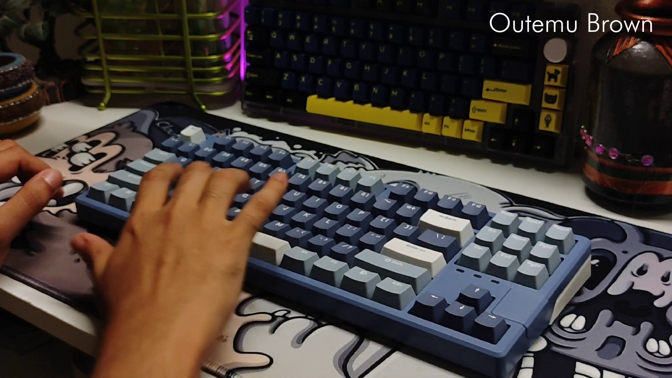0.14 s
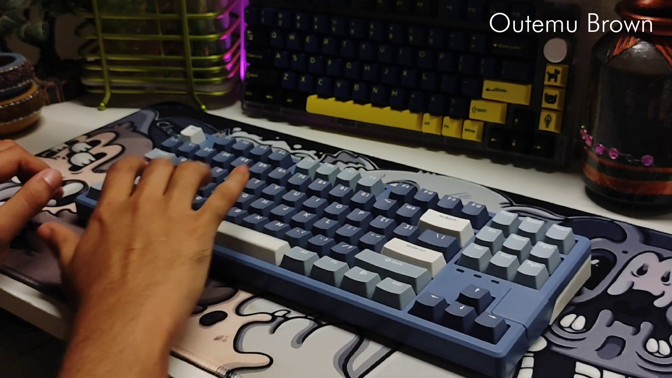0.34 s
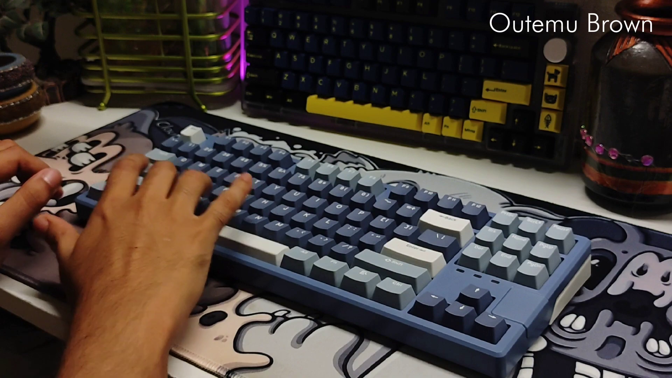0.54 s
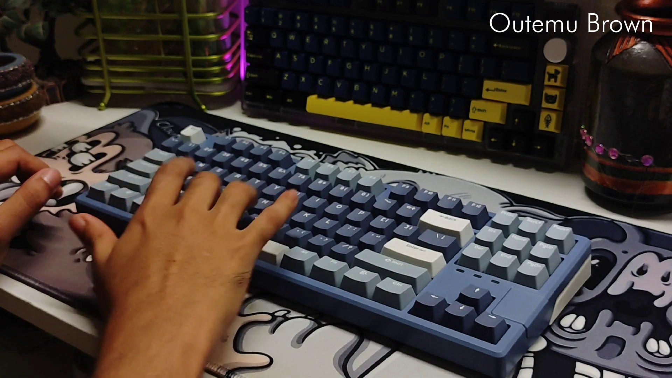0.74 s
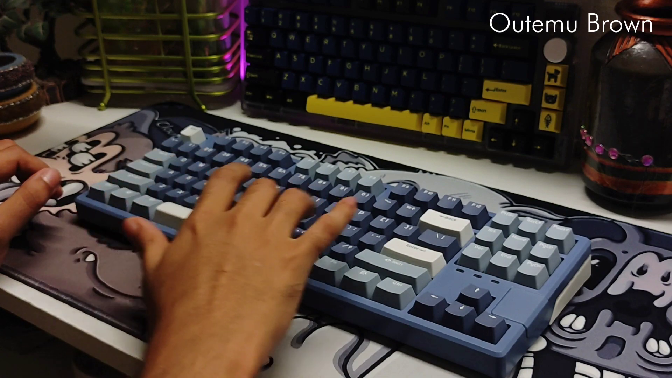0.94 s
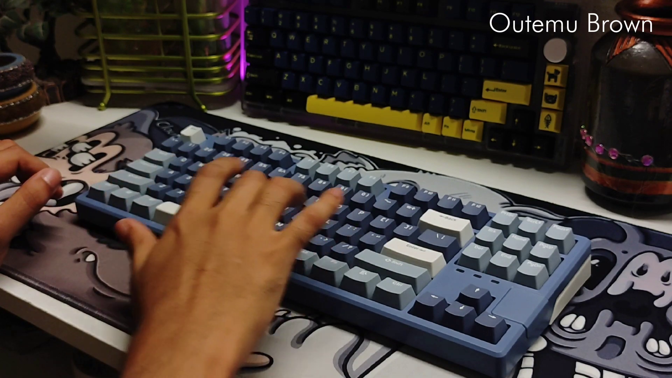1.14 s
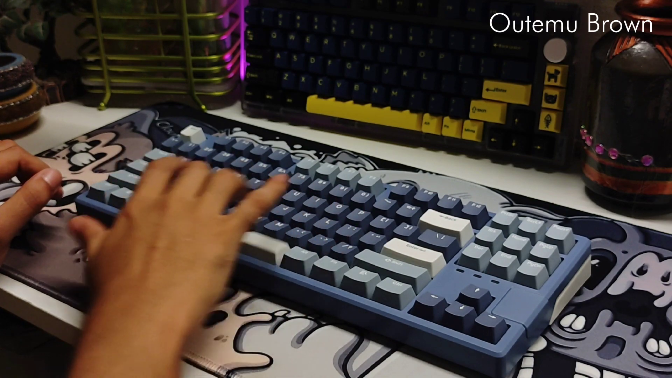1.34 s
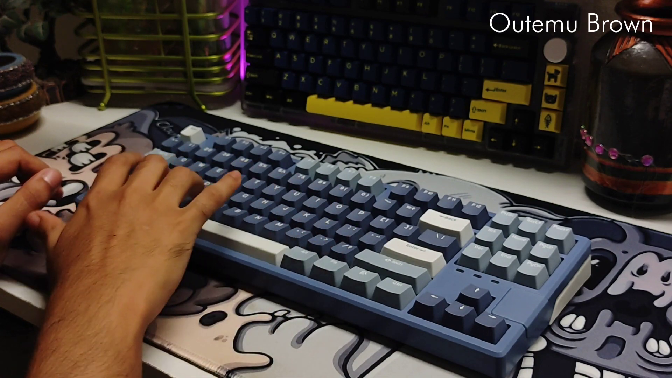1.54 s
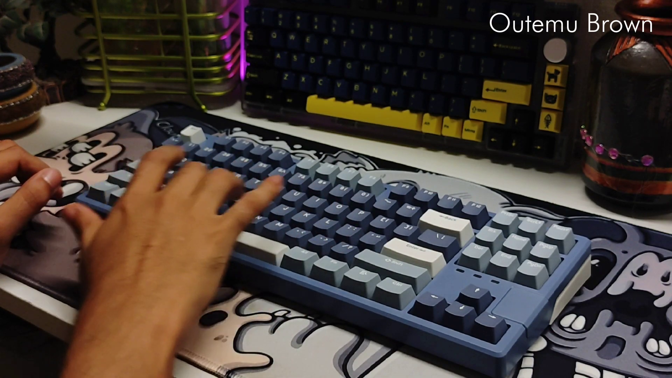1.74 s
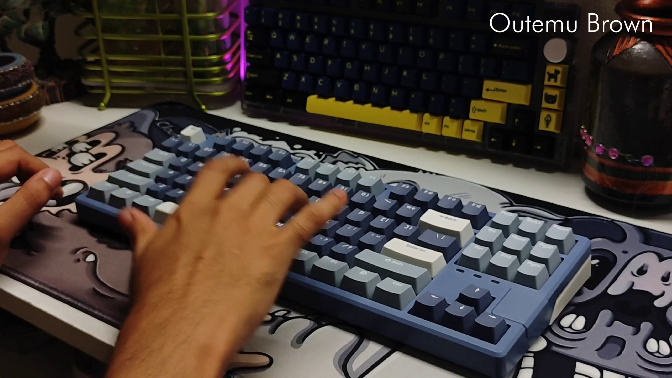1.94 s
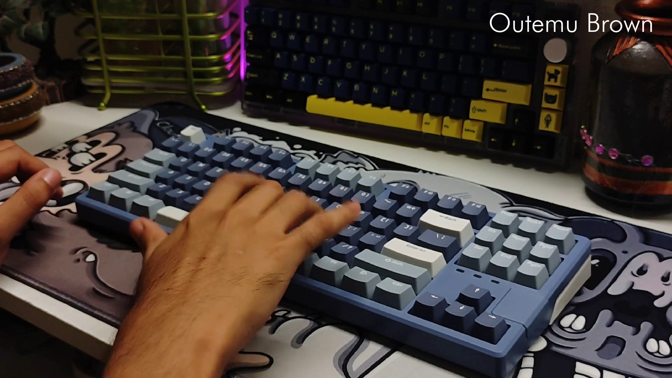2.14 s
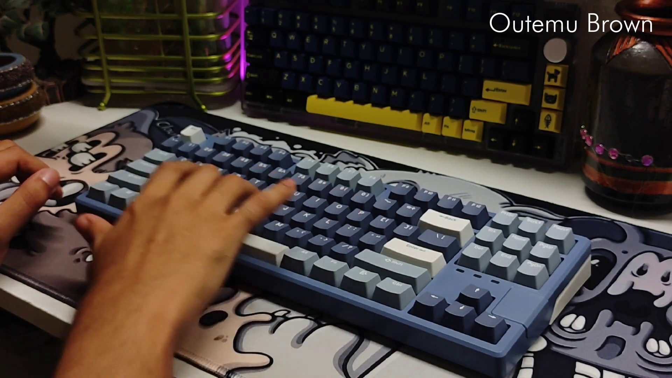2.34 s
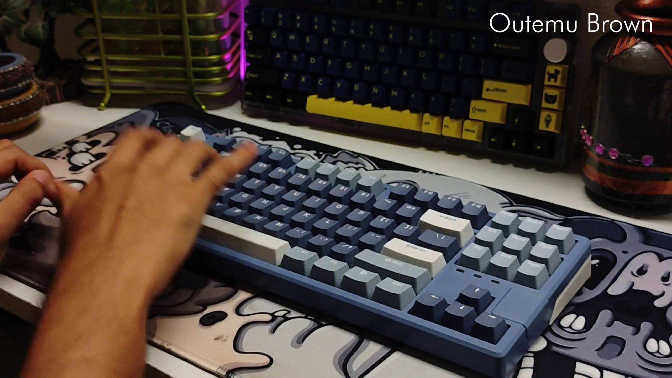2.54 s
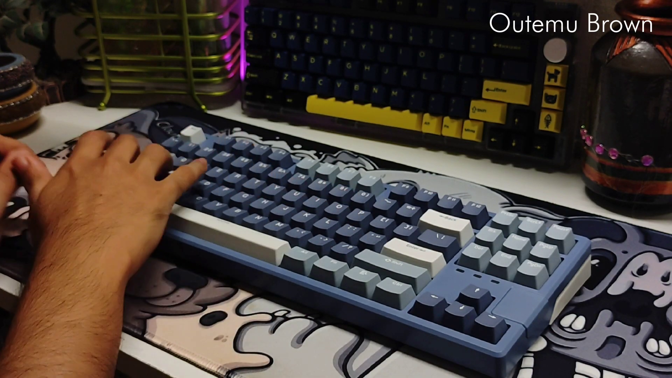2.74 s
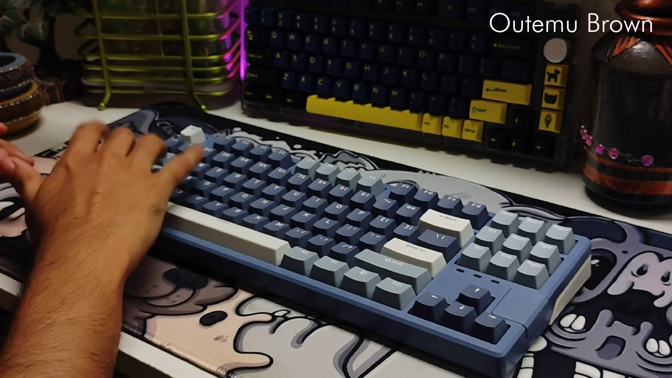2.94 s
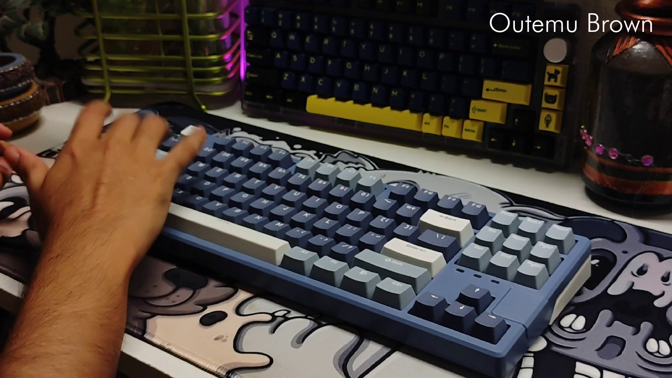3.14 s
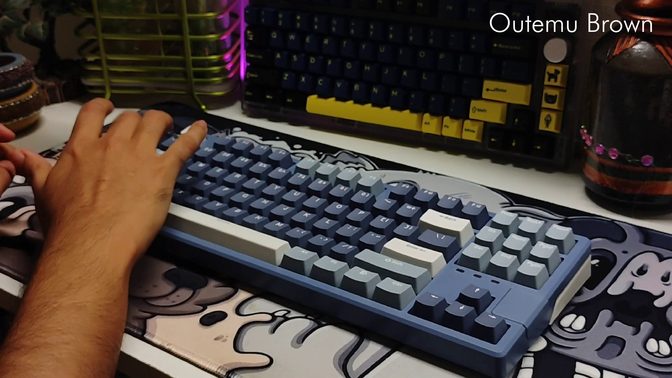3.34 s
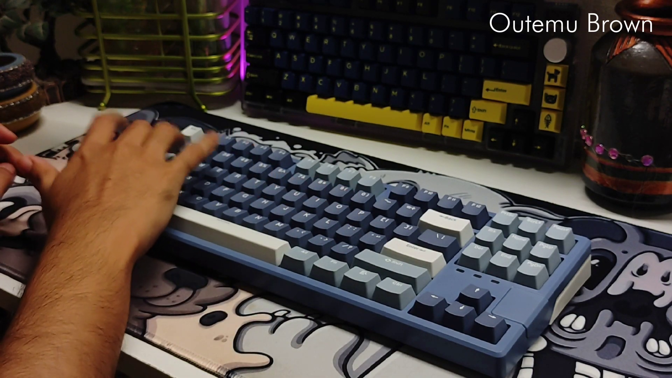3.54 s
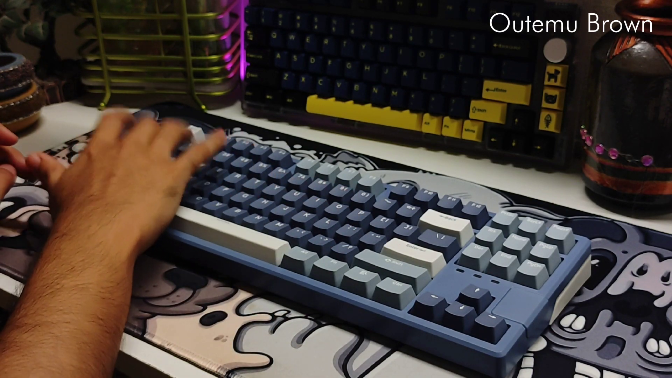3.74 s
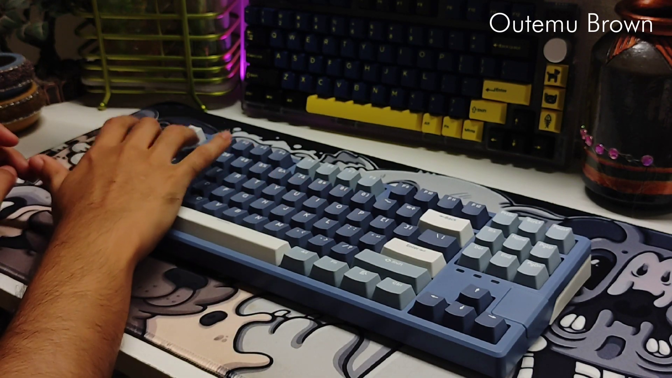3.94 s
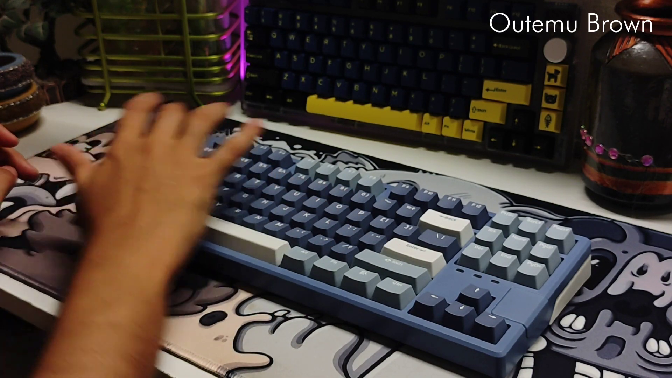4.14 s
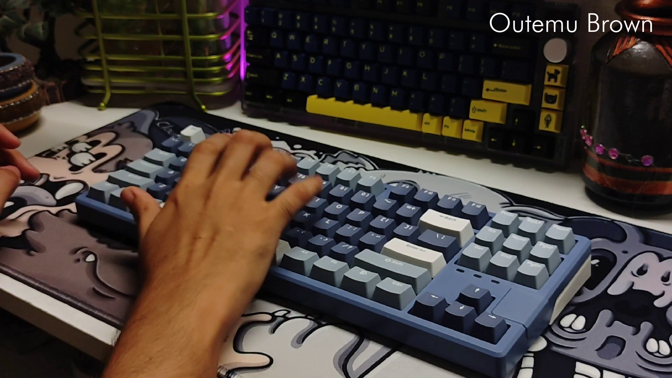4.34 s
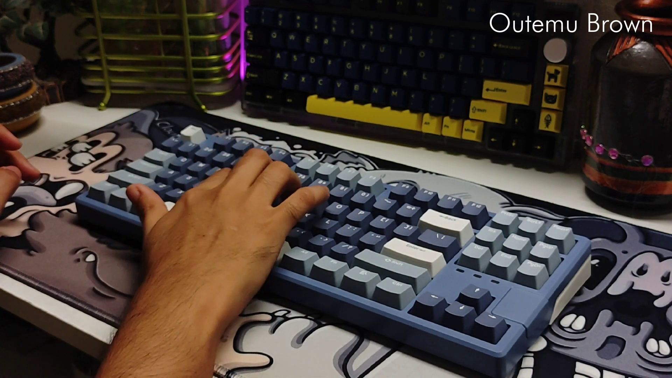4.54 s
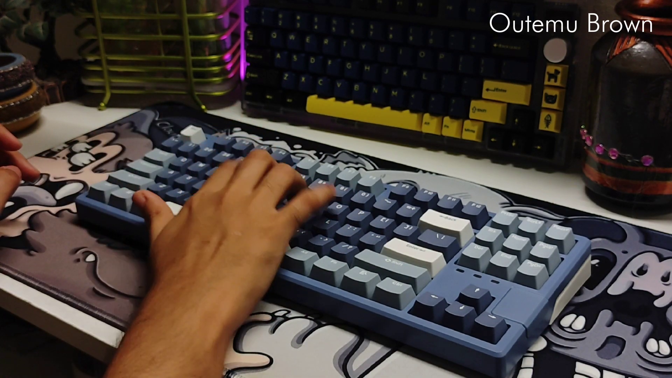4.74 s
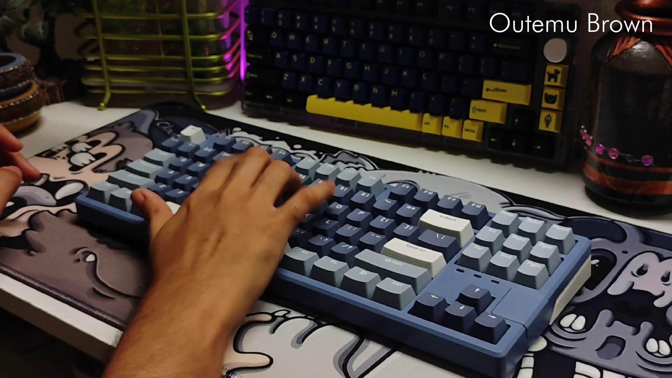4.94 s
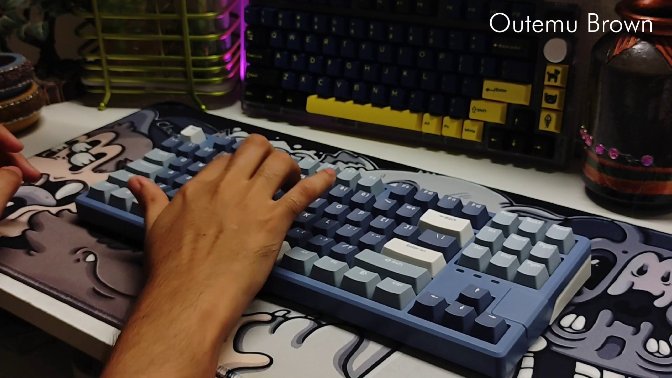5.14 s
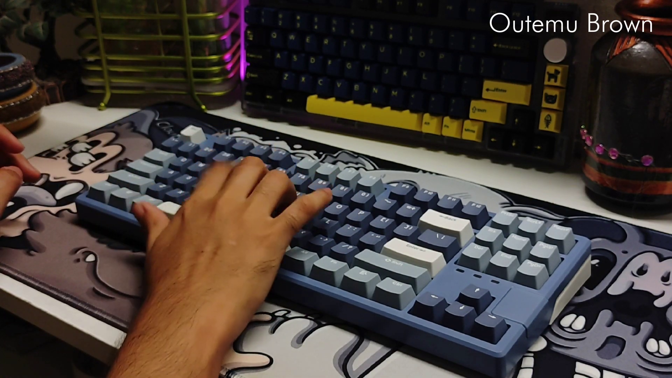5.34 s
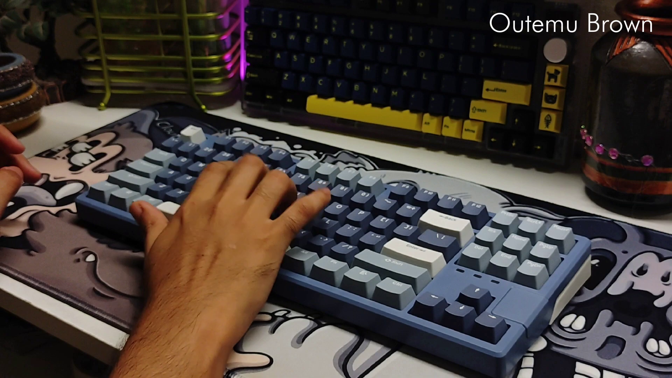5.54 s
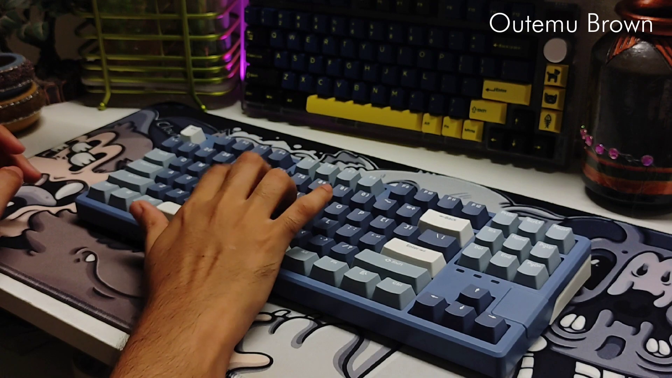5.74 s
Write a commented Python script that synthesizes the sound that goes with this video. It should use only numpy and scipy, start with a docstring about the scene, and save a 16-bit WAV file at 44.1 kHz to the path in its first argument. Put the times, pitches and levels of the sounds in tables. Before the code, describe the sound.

Close, dry key clatter in a small, quiet indoor room. Each press lands with a dull plastic clack, each release snaps back brighter, with tiny stem scrapes, finger taps and rattles. Rolling strokes grow harder around two to four seconds, pause briefly, then resume as a quicker, softer patter with a small break near five seconds. Low desk thuds and very faint spring ringing sit underneath.

```python
"""Fast dull clacks and bright clicks: one hand drums on a mechanical keyboard, close to the microphone.
The board lies on a desk mat in a quiet room. Keys clack dull at the bottom and bright on springing back,
as struck plate and cap modes; stem scrape and finger rub are coloured noise, rattles are random knocks.
The hollow case and the desk thump as low modes, springs ping in faint clusters of tones,
and the small room smears it all with fading noise tails over a steady bed of air noise."""
import sys
import numpy as np
from scipy import signal
from scipy.fft import rfft, irfft
from scipy.io import wavfile

SR = 44100
rng = np.random.default_rng(int(sys.argv[2]) if len(sys.argv) > 2 else 0)


def generate_wav(sig):
    """Save sig (samples, or channels by samples) to the path in sys.argv[1] as 16-bit PCM at SR."""
    pcm = np.round(np.clip(np.atleast_2d(sig).T, -1, 1) * 32767).astype(np.int16)
    wavfile.write(sys.argv[1], SR, pcm)


N = 260171

# key strokes, down and up: t/s, clack level/dB, click level/dB, clack centre f/Hz
KEY_STROKES = [(0.025, -27, -49, 2420), (0.073, -24.5, -23.5, 2600), (0.215, -36.5, -53, 1950),
               (0.303, -32, -30.5, 2350), (0.4, -38, -59, 1970), (0.482, -38.5, -39, 2750),
               (0.559, -37, -54, 1900), (0.635, -29, -29.5, 3170), (0.713, -31, -49, 1570),
               (0.803, -30, -29, 2770), (0.974, -38.5, -33.5, 2400), (1.028, -29, -52, 2180),
               (1.13, -34.5, -28.5, 2580), (1.219, -27.5, -55, 2420), (1.307, -31.5, -28.5, 3050),
               (1.387, -35, -45.5, 1900), (1.471, -39.5, -37, 2570), (1.537, -30.5, -47, 2340),
               (1.632, -35.5, -34.5, 2830), (1.703, -28, -44, 2150), (1.857, -37, -62, 1900),
               (1.936, -32, -33.5, 2840), (2, -26.5, -47, 2440), (2.078, -28, -25, 3400),
               (2.165, -23.5, -41.5, 2800), (2.257, -30, -25.5, 2860), (2.34, -38.5, -53, 1560),
               (2.461, -22, -33.5, 2830), (2.555, -29, -28, 2430), (2.748, -22, -31, 1740),
               (2.83, -31.5, -33, 1530), (2.907, -26.5, -34, 3570), (2.986, -29.5, -33, 1550),
               (3.053, -21.5, -27.5, 4030), (3.142, -27, -26.5, 1460), (3.265, -28, -32.5, 1740),
               (3.332, -28.5, -26, 1860), (3.425, -30, -35, 1770), (3.493, -30.5, -26.5, 1830),
               (3.562, -29.5, -33, 2000), (3.647, -29.5, -25, 1670), (3.771, -24.5, -23, 2220),
               (3.844, -33, -25.5, 2260), (3.935, -28.5, -33, 2150), (4.094, -36, -30.5, 2430),
               (4.492, -32.5, -41.5, 1910), (4.553, -34, -44.5, 1970), (4.615, -37.5, -36, 2120),
               (4.647, -36.5, -35, 1870), (4.737, -29.5, -43, 1880), (4.792, -33, -42.5, 1930),
               (4.841, -35, -29.5, 2260), (4.893, -33.5, -26.5, 2070), (4.939, -36.5, -44, 1900),
               (4.994, -25.5, -33.5, 2080), (5.067, -46, -39, 2090), (5.113, -34.5, -36, 2178),
               (5.359, -37.5, -54, 1960), (5.393, -29, -31.5, 2900), (5.456, -34, -31, 2280),
               (5.496, -37.5, -35.5, 2120), (5.585, -34, -46.5, 2022), (5.633, -37, -46.5, 2380),
               (5.694, -34.5, -32.5, 2570), (5.733, -43, -42, 2400), (5.802, -34.5, -45.5, 2140),
               (5.856, -36.5, -48, 2420)]
# places the hand moves over, each sounding different: from t/s, two cap rings f/Hz, f/Hz,
# cap focus/dB lost one octave away, scrape level/dB re mean of clack and click, rub level/dB,
# hollow level/dB re clack, case level/dB for a middling press, bump lead t/ms, bump level/dB on a press,
# desk level/dB for a middling stroke (midway between press and release), spring level/dB re click
KEY_PLACES = [(0, 4500, 7460, 4, -8, -61.5, -9, -35, 21.3, -47, -37, -52),
              (2.05, 4140, 8050, 12, -16.5, -59, -11, -35.5, 25, -46, -36.5, -33),
              (2.7, 5100, 6960, 13, -21, -63, -13, -51, 10.5, -56, -40, -37),
              (3.1, 7860, 9600, 380, -39, -68, -7, -47.5, 11, -44.5, -43, -36),
              (3.2, 5600, 8830, 32, -20, -76, -8, -46, 6.3, -68.5, -35.5, -30),
              (3.7, 6700, 10400, 110, -21, -80, -8, -46, 6.3, -60.5, -36, -17),
              (4.4, 7540, 8730, 490, -9.5, -66, -16, -48, 5.9, -45.5, -36.5, -29.5)]
# loudest finger taps and rebounds: t/s, clack level/dB, click level/dB
FINGER_TAPS = [(0.005, -38.5, -37.5), (0.011, -39, -52), (0.062, -33.5, -40), (0.197, -39, -39),
               (0.372, -36, -35.5), (0.865, -51, -65), (1.197, -44, -44.5), (1.364, -39, -36),
               (1.505, -45.5, -42.5), (2.146, -54, -44), (2.888, -62, -40.5), (3.258, -45, -34.5),
               (3.505, -39, -41), (3.658, -39, -38), (3.85, -47, -35), (3.856, -77.5, -40),
               (4.085, -47, -48), (4.098, -70, -38), (4.468, -54, -56), (4.599, -43.5, -44),
               (4.621, -44, -39.5), (4.73, -46, -44), (4.741, -36, -42), (4.782, -47, -46),
               (4.827, -44, -38.5), (4.944, -37, -45), (5.073, -44, -45), (5.086, -45, -38.5),
               (5.339, -48, -52), (5.347, -43, -46.5), (5.45, -40, -44), (5.74, -38, -37),
               (5.848, -43, -50)]
# strokes after which the hand slides on: t/s, added rub level/dB
HAND_SLIDES = [(0.072, 3.5), (0.803, 6.5), (1.218, 6), (1.702, 9)]
# plate modes: f/Hz, level/dB, t60/ms
PLATE_MODES = [(1250, 5, 11), (1950, 7, 10), (2186, 12, 10), (2666, 10, 8), (3140, 16, 5), (3450, 10, 12),
               (3970, 11, 7)]
# cap modes: f/Hz, level/dB, t60/ms
CAP_MODES = [(4430, 10, 11), (5100, 7, 8), (6400, 12, 3.5), (6890, 6, 8), (7500, 9, 8), (8650, 11.5, 7),
             (10340, 0, 6), (11700, 4, 6)]
# hollow case modes: f/Hz, level/dB, t/ms until the swing is widest
CASE_MODES = [(177.4, -3, 13.3), (227.6, 9.5, 5.5), (310.3, -3.5, 11.6)]
# air under the plate, modes: f/Hz, level/dB, t60/ms
HOLLOW_MODES = [(426, -11, 54), (630, -1, 17), (1047, 10.5, 5.9)]
# spring modes: f/Hz, level/dB, t60/ms
SPRING_MODES = [(5130, 10, 240), (6270, -9, 150), (6710, 0, 320), (7430, -8, 150), (8750, -4, 150),
                (9030, -6, 130), (10350, -3, 170)]
# desk modes: f/Hz, level/dB, t60/ms
DESK_MODES = [(45.6, 2, 480), (57.7, 16, 185), (78.5, 14, 108), (111.2, 9, 100)]
# room tail: f/Hz, level/dB, t60/s
ROOM_TAIL = [(60, -33.5, 0.53), (195, -1.5, 0.57), (440, 2.5, 0.48), (2140, -4.5, 0.3), (5370, -4.5, 0.32),
             (8500, -9.5, 0.32), (14200, -16.5, .3)]
# spectrum of the quiet room's air: f/Hz, relative level/dB per Hz
AIR_SPECTRUM = [(18, -30), (35, -3), (100, 0), (250, -15), (700, -30), (2200, -32), (5000, -43),
                (15000, -55)]

AIR_DB = -51  # rms
MIDDLING_DB = -27  # a stroke of middling strength
CASE_PER_DB, DESK_PER_DB = 0.26, 0.41  # dB gained per dB of stroke
DESK_PRESS_DB = 3.2  # added on a press, taken off on a release
CASE_RELEASE_DB, BUMP_RELEASE_DB = 2, -1  # what a release adds
SCRAPE_RELEASE_DB = -13  # the stem slides back almost freely
BUMP_SPREAD, BUMP_CLICK_DB = 0.11, -10  # share of the lead; click relative to clack


def undb(db):
    """Turn decibels into an amplitude factor."""
    return 10 ** (np.asarray(db) / 20)


def level(rows, db, size):
    """Scale each row so that its first samples have the given rms level."""
    rms = np.sqrt(np.mean(rows[:, :size] ** 2, axis=1))
    return rows * (undb(db) / rms)[:, None]


def place(times, rows):
    """Lay each row on the time line."""
    out = np.zeros(N + 2 * SR)
    for s, row in zip(times, rows):
        at = max(int(s * SR), 0)
        out[at:at + len(row)] += row
    return out[:N]


def octaves_off(hz, centres_hz):
    """Squared distance in octaves from each frequency to the nearest of each event's centres."""
    centres_hz = centres_hz.reshape(len(centres_hz), 1, -1)
    return np.min(np.log2(hz[:, None] / centres_hz) ** 2, axis=2)


def bins_hz(size):
    """Frequencies of the spectrum, kept off zero."""
    return np.maximum(np.fft.rfftfreq(size, 1 / SR), 1)


def ring(modes, centre_hz, focus_db, size, detune, scatter_db):
    """Decaying modes; the struck spot favours those near its centres (focus dB lost one octave away)."""
    hz, db, t60_ms = (column[:, None] for column in np.transpose(modes))
    chance = rng.standard_normal((len(centre_hz), len(modes), 2))
    loss_db = np.minimum(focus_db * octaves_off(hz[:, 0], centre_hz)[..., None], 26)
    db = db - loss_db + scatter_db * chance[..., 1:]
    t = np.arange(size) / SR
    tuned_hz = hz * (1 + detune * chance[..., :1])
    decay = 1000. ** (-1000 * t / t60_ms)
    return np.sum(undb(db) * np.sin(2 * np.pi * tuned_hz * t) * decay, axis=1)


def air():
    """The quiet room's steady noise, shaped by its spectrum."""
    hz, db = np.transpose(AIR_SPECTRUM)
    gain_db = np.interp(np.log(bins_hz(N)), np.log(hz), db)
    noise = irfft(rfft(rng.standard_normal(N)) * undb(gain_db), N)
    return level(noise[None], AIR_DB, size=N)


def contacts(looseness, size, density=.07):
    """A first blow, then sparse smaller knocks of the loose stem that die away."""
    chance = rng.random((len(looseness), size, 2))
    ms = 1000 * np.arange(size) / SR
    fade_ms = 2.66 * np.maximum(looseness[:, None] - .8, .1)
    knocks = (chance[..., 0] < density) * (2 * chance[..., 1] - 1)
    knocks *= np.exp(-(ms / fade_ms) ** 2)
    knocks[:, 0] = 1
    return knocks


def clack(s, clack_db, click_db, plate_hz, cap_hz, focus_db, looseness):
    """Plastic on plate: low plate modes and high cap modes, in loose clusters, rung by the same contacts."""
    blows = contacts(looseness, size=600)
    plate = ring(4 * PLATE_MODES, plate_hz, 30., size=500, detune=.09, scatter_db=2.5)
    plate = signal.fftconvolve(plate, blows, axes=1)
    cap = ring(3 * CAP_MODES, cap_hz, focus_db[:, None, None], size=500, detune=.03, scatter_db=3.)
    cap = signal.fftconvolve(cap, blows, axes=1)
    # a landing lasts a little while, so the plate starts without a sharp edge
    plate = signal.sosfilt(signal.butter(2, [750, 5500], "band", fs=SR, output="sos"), plate)
    cap = signal.sosfilt(signal.butter(1, 3000, "high", fs=SR, output="sos"), cap)
    return place(s, level(plate, clack_db, size=400) + level(cap, click_db, size=400))


def bumps(s, lead_ms, bump_db, cap_hz, focus_db):
    """The stem snaps over the tactile bump: a small dull tick a moment before each stroke."""
    count = len(s)
    times = s - lead_ms / 1000 * (1 + BUMP_SPREAD * rng.standard_normal(count))
    return clack(times, bump_db, bump_db + BUMP_CLICK_DB, np.full(count, 2100.),
                 cap_hz, focus_db, np.full(count, 2.2))


def finger_taps(cap_hz, focus_db):
    """Finger taps and rebounds ring plate and cap like small loose strokes."""
    s, clack_db, click_db = np.transpose(FINGER_TAPS)
    return clack(s, clack_db, click_db, np.full(len(s), 2100.), cap_hz, focus_db, np.full(len(s), 2.2))


def scrape(s, scrape_db, centres_hz, slide_ms=12.0, focus_db=22.0):
    """The stem slides in its housing just before it lands: a grainy hiss in the colour of plate and cap."""
    size = int(slide_ms * SR / 1000)
    chance = rng.standard_normal((len(s), size, 2))
    grit = chance[..., 0] * undb(2.9 * chance[..., 1]) * np.linspace(.6, .9, size)
    colour = undb(-focus_db * octaves_off(bins_hz(size), centres_hz))
    grit = irfft(rfft(grit) * colour, size)
    return place(s - size / SR, level(grit, scrape_db, size=size))


def ping(s, spring_db, cap_hz, focus_db):
    """Springs sing on faintly in loose clusters of three tones, most near the ring of their cap."""
    focus_db = 8 + focus_db[:, None, None]
    spring = ring(3 * SPRING_MODES, cap_hz, focus_db, size=SR // 4, detune=.004, scatter_db=3.)
    return place(s, level(spring, spring_db, size=400))


def hollow(s, hollow_db):
    """The air under the plate gives a short low knock."""
    knock = ring(HOLLOW_MODES, np.ones(len(s)), 0, size=2000, detune=.1, scatter_db=3.)
    return place(s, level(knock, hollow_db, size=400))


def rub(s, rub_db, cap_hz, focus_db):
    """Skin drags over the caps: a gritty cap-coloured hiss up to the next stroke or a fifth of a second."""
    size = SR // 5
    chance = rng.standard_normal((len(s), size, 2))
    drag = chance[..., 0] * undb(5.5 * chance[..., 1])
    drag *= np.sqrt(1 - np.arange(size) / size)
    colour = undb(-focus_db[:, None] * octaves_off(bins_hz(size), cap_hz) / 2)
    drag = irfft(rfft(drag) * colour, size)
    drag = signal.sosfilt(signal.butter(1, 1200, "high", fs=SR, output="sos"), drag)
    lasts = np.arange(size) / SR < np.diff(s, append=N / SR)[:, None]
    return place(s, level(drag, rub_db, size=400) * lasts)


def case_thump(s, down, case_db):
    """The hollow case swells up and rings one way on a press, the other way on a release."""
    t = np.arange(6000) / SR
    chance = rng.standard_normal((len(s), len(CASE_MODES)))
    case = 0
    for (hz, db, peak_ms), tune in zip(CASE_MODES, chance.T):
        late = 1000 * t / peak_ms
        swell = (late * np.exp(1 - late)) ** 2
        tuned_hz = hz * (1 + tune[:, None] / 12)
        case = case + undb(db) * swell * np.cos(2 * np.pi * tuned_hz * (t - .0085))
    return place(s, level(case * down[:, None], case_db, size=1200))


def desk_thump(s, desk_db, lag_ms=1.1, onset_ms=7.4):
    """The desk rings low just after the case; its heavy top gets going slowly."""
    size = 12000
    desk = ring(DESK_MODES, np.ones(len(s)), 0, size=size, detune=.05, scatter_db=2.)
    desk *= 1 - np.exp(-1000 * np.arange(size) / SR / onset_ms)
    return place(s + lag_ms / 1000, level(desk, desk_db, size=2200))


def rebounds(s, clack_db, click_db, plate_hz, cap_hz, focus_db, count=4, within_ms=50., below_db=-21.):
    """Neighbouring caps and the stem chatter faintly for a while after each stroke."""
    chance = rng.random((len(s), count, 3))
    late = chance[..., 0]
    dull_db = clack_db[:, None] + below_db - 8 * late - 9 * chance[..., 1]
    bright_db = click_db[:, None] + below_db - 8 * late - 9 * chance[..., 2]
    times = (s[:, None] + 0.0056 + late * within_ms / 1000).ravel()
    colour = (column.repeat(count, axis=0) for column in (plate_hz, cap_hz, focus_db))
    return clack(times, dull_db.ravel(), bright_db.ravel(), *colour, np.full(times.size, 1.6))


def room(x, s, onset_ms=0.37, count=8):
    """Diffuse tails of third-octave noises, each fading at its own rate after a soft start."""
    t = np.arange(SR // 2) / SR
    hz, db, t60 = np.transpose(ROOM_TAIL)
    noise, tails = rng.standard_normal((count, len(t))), 0
    for mid in 40 * 2 ** np.arange(0, 8.7, 1 / 3):
        edges_hz = [mid * 2 ** (-1 / 6), mid * 2 ** (1 / 6)]
        band = signal.sosfilt(signal.butter(2, edges_hz, "band", fs=SR, output="sos"), noise)
        gain_db, fade_s = (np.interp(np.log(mid), np.log(hz), column) for column in (db, t60))
        # longer fades are scaled down to carry the same energy
        spread = np.sqrt(fade_s * SR / (2 * np.log(1000)))
        tails = tails + band * undb(gain_db - 60 * t / fade_s) / spread
    tails = tails * (1 - np.exp(-1000 * t / onset_ms))
    # the tails take turns from stroke to stroke
    edges = np.r_[0, (s[1:] * SR).astype(int), N]
    spans = enumerate(zip(edges, edges[1:]))
    wet = [signal.fftconvolve(x[a:b], tails[k % count]) for k, (a, b) in spans]
    return place(edges[:-1] / SR, wet)


def scene():
    """Sum every part of each stroke close by, then add the room and its air."""
    s, clack_db, click_db, plate_hz = np.transpose(KEY_STROKES)
    places = np.array(KEY_PLACES)
    here = places[np.searchsorted(places[:, 0], s) - 1]
    cap_hz = here[:, 1:3]
    (focus_db, scrape_db, rub_db, hollow_db, case_db,
     lead_ms, bump_db, desk_db, spring_db) = here[:, 3:].T
    tap_s = np.transpose(FINGER_TAPS)[0]
    tap_here = places[np.searchsorted(places[:, 0], tap_s) - 1]

    # presses are dull, releases bright
    down = np.where(clack_db - click_db > 4.5, 1., -1.)
    release = down < 0
    stroke_db = np.maximum(clack_db, click_db)
    # a cap that springs back is free to rattle, and soft strokes land less squarely
    looseness = np.where(release, -.8, -1.5) - 0.1 * stroke_db
    for slide_s, slide_db in HAND_SLIDES:
        rub_db[np.argmin(np.abs(s - slide_s))] += slide_db
    scrape_db = (clack_db + click_db) / 2 + scrape_db + SCRAPE_RELEASE_DB * release
    case_db = case_db + CASE_PER_DB * (stroke_db - MIDDLING_DB) + CASE_RELEASE_DB * release
    # the desk takes more from hard strokes and from presses
    desk_db = desk_db + DESK_PER_DB * (clack_db - MIDDLING_DB) + DESK_PRESS_DB * down

    keys = bumps(s, lead_ms, bump_db + BUMP_RELEASE_DB * release, cap_hz, focus_db)
    keys += finger_taps(tap_here[:, 1:3], tap_here[:, 3])
    keys += scrape(s, scrape_db, np.c_[plate_hz, cap_hz])
    keys += clack(s, clack_db, click_db, plate_hz, cap_hz, focus_db, looseness)
    keys += ping(s, click_db + spring_db, cap_hz, focus_db)
    keys += hollow(s, clack_db + hollow_db)
    keys += rub(s, rub_db, cap_hz, focus_db)
    keys += case_thump(s, down, case_db) + desk_thump(s, desk_db)
    keys += rebounds(s, clack_db, click_db, plate_hz, cap_hz, focus_db)
    return keys + room(keys, s) + air()


def record(dry):
    """The microphone loses the deepest bass and highest treble; the recorder cuts the top steeply."""
    mic = signal.sosfilt(signal.butter(3, 40, "high", fs=SR, output="sos"), dry)
    mic = signal.sosfilt(signal.butter(3, 13500, fs=SR, output="sos"), mic)
    return signal.sosfilt(signal.ellip(10, .2, 80, 16300, fs=SR, output="sos"), mic)


dry = scene()
out = record(dry)
generate_wav(out)
```